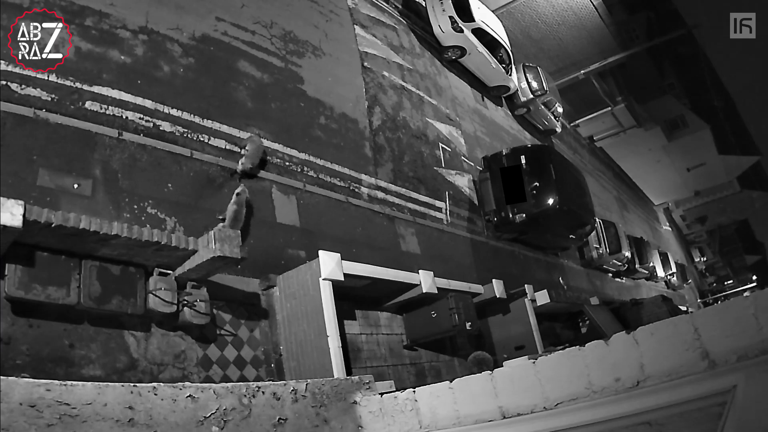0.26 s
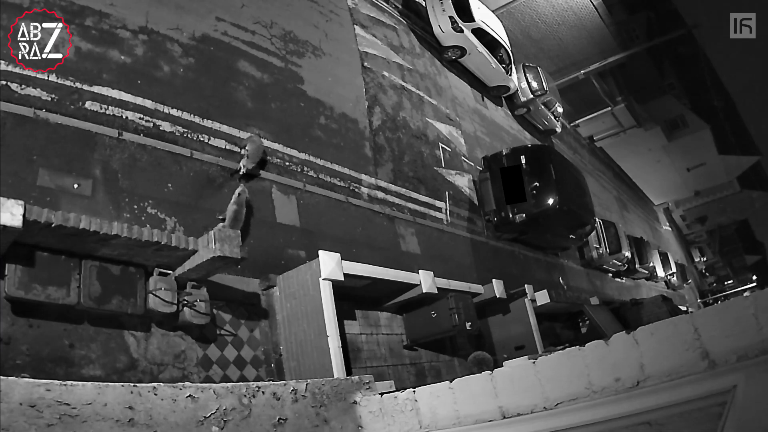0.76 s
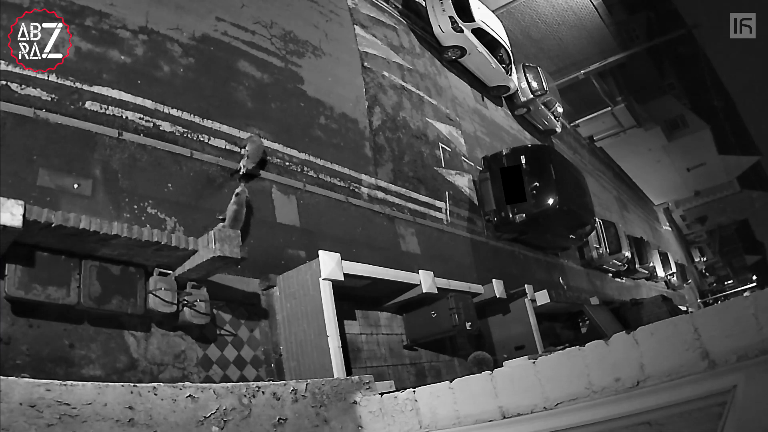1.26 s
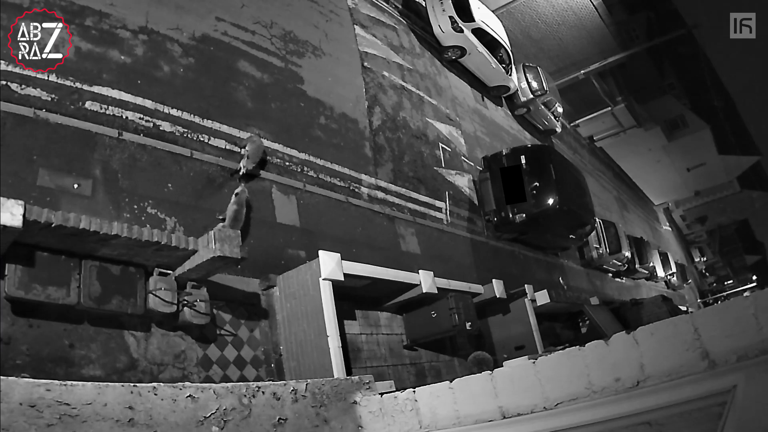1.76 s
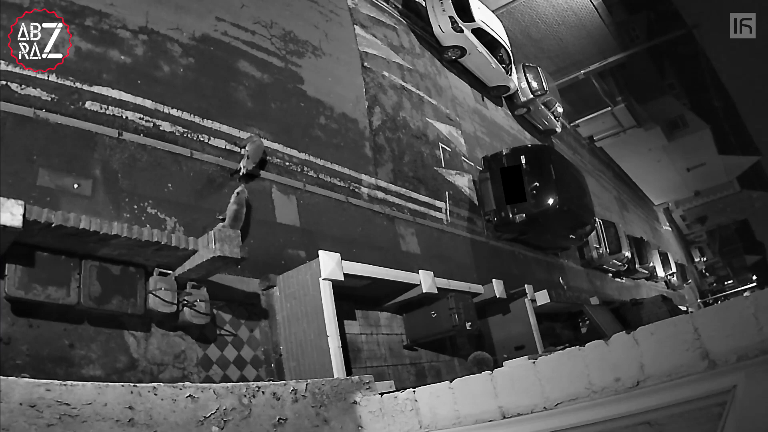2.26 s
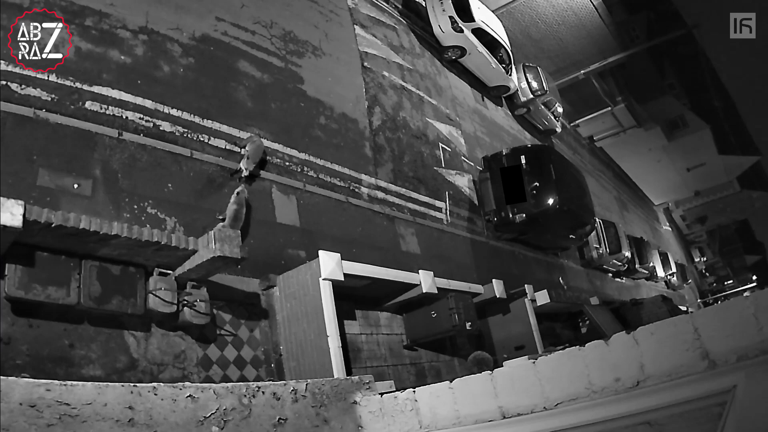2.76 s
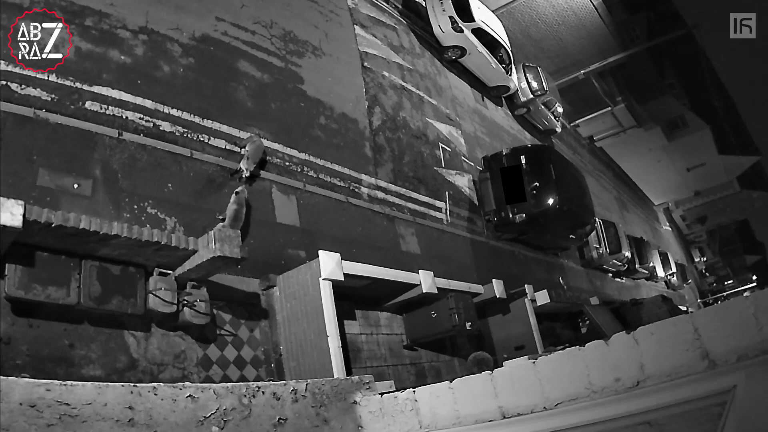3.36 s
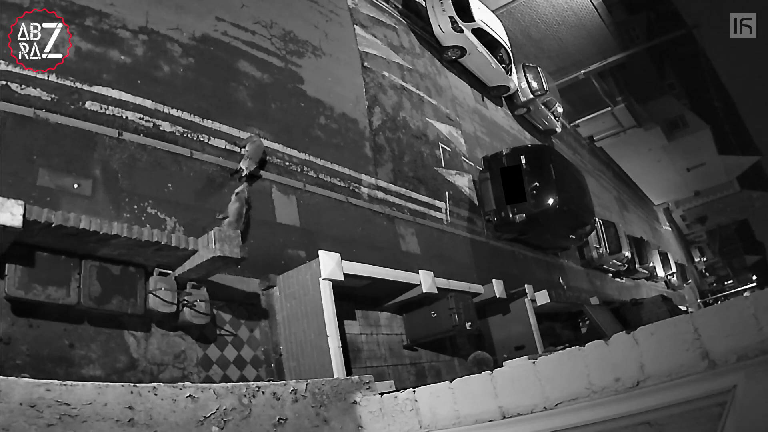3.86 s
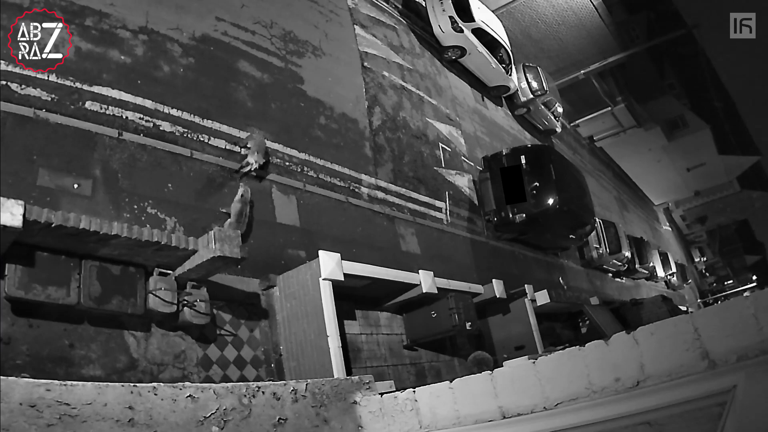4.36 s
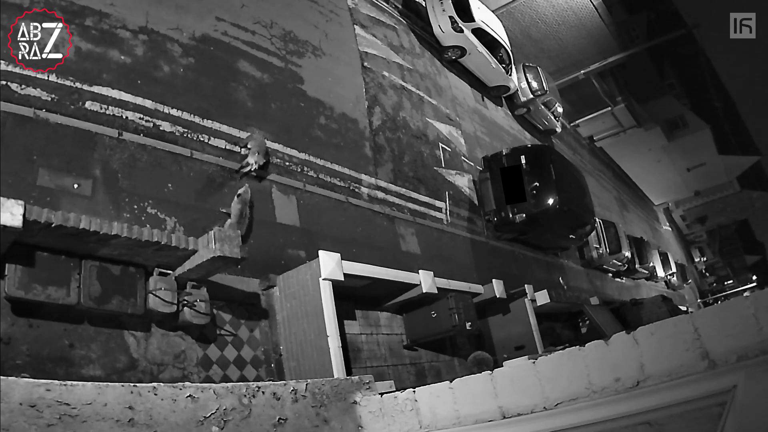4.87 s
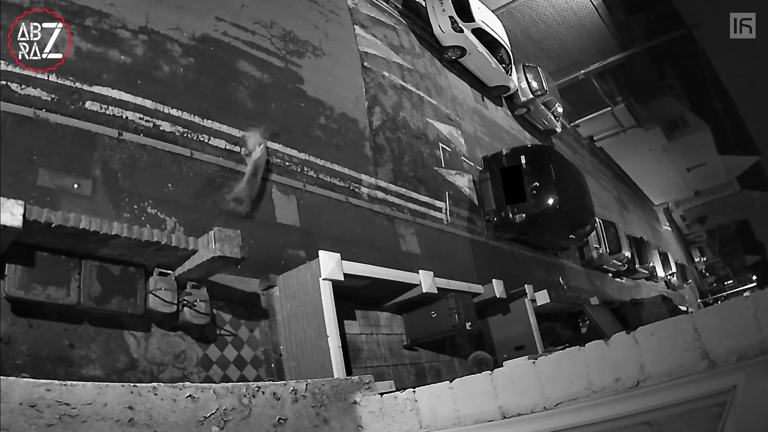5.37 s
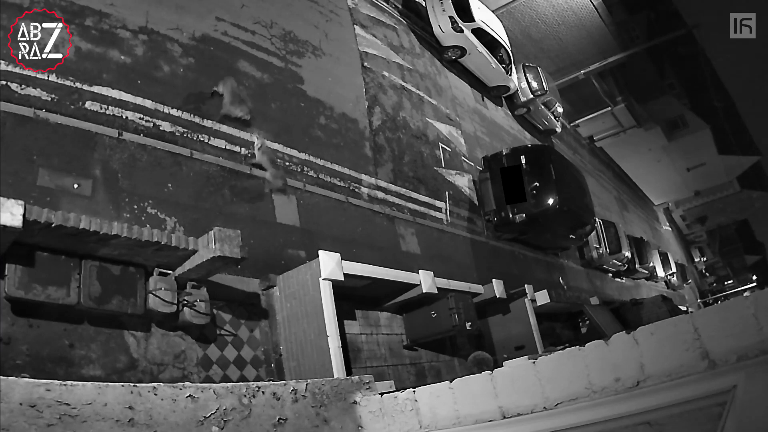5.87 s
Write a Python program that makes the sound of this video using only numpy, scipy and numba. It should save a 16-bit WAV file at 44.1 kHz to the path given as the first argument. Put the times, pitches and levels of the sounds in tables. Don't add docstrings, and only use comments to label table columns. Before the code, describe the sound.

Two foxes quarrel in a quiet street at night, picked up by a wall camera with faint air noise and low mains hum. A fluttering high yelp comes at 0.1 s, then a short hoarse screech at 0.3 and a rough yelp at 0.5, another screech at 0.8. From 1.1 to 1.7 s a quick run of chattering yelps leads into a longer raspy screech lasting until about 2.0. Paired yelp and screeches follow at 2.1-2.6, another exchange at 2.9-3.7 with a drawn-out falling yelp, and a strong screech at 3.9. Both voices burst together at 4.3 and 4.7-5.2. After 5.3 the chatter becomes dense and barking, with whistling, hissing screeches at 5.6, 5.8 and 6.1 to the end. Short house-front echoes trail each call; the treble is gritty and metallic.

```python
import sys
import numpy as np
from scipy import signal
from scipy.fft import rfft, irfft
from scipy.io import wavfile
from scipy.ndimage import uniform_filter1d
from numba import njit

SR = 44100
rng = np.random.default_rng(int(sys.argv[2]) if len(sys.argv) > 2 else 0)


def level_to_linear(level):
    exponent = np.asarray(level, float) / 20
    return 10 ** exponent


def put_to_file(sound):
    columns = np.atleast_2d(sound).T
    safe = np.clip(columns, -1, 1)
    whole_steps = np.round(safe * 32767)
    wavfile.write(sys.argv[1], SR, whole_steps.astype(np.int16))


N = 269892
T = np.arange(N) / SR

# centre_hz, width_hz, level_db
MOUTH_MODES = [(2704, 101, -7), (3595, 630, 4), (4278, 307, 10), (4917, 176, 8.5), (5453, 447, 0.5),
               (6615, 350, -10.5)]


def unit(x):
    return x / np.sqrt(np.mean(x ** 2))


def ramp(x):
    return np.clip(x, 0, 1)


def coloured(x, gain):
    return irfft(rfft(x) * gain(np.fft.rfftfreq(N, 1 / SR) + 1), N)


def shaped(x, points):
    hz, db = np.transpose(points)
    return coloured(x, lambda f: level_to_linear(np.interp(np.log(f), np.log(hz), db)))


def noise(points):
    return unit(shaped(rng.standard_normal(N), points))


def walk(rate_hz):
    k = max(int(SR / 16 / rate_hz), 2)
    coarse = rng.standard_normal(N // 16 + 2)
    coarse = unit(uniform_filter1d(uniform_filter1d(coarse, k), k))
    return np.interp(np.arange(N) / 16, np.arange(len(coarse)), coarse)


@njit
def band(x, hz, width_hz):
    y, b, l = np.empty(len(x)), np.zeros(2), np.zeros(2)
    for i in range(len(x)):
        g, k, u = np.tan(np.pi * hz[i] / SR), width_hz / hz[i], x[i]
        for s in range(2):
            v = (b[s] + g * (u - l[s])) / (1 + g * (g + k))
            b[s], l[s], u = 2 * v - b[s], l[s] + 2 * g * v, k * v
        y[i] = u
    return y


def resonate(x, modes, stretch, patchy_db):
    out = 0
    stretch = stretch * (1 + 0.012 * walk(18))
    for hz, width_hz, db in modes:
        gain = level_to_linear(db + patchy_db * walk(38)) / np.sqrt(width_hz)
        out = out + gain * band(x, hz * stretch, 3.11 * width_hz)
    return unit(out)


def calls(rows, length_column, fade_s):
    which = np.maximum(np.searchsorted(rows[:, 0], T) - 1, 0)
    since_s, length_s = T - rows[which, 0], rows[which, length_column]
    gate = ramp(np.minimum(since_s, length_s - since_s) / fade_s)
    return which, since_s, gate, rows[which, 1:].T


def flap_count(which, since_s, flap_hz):
    count = np.cumsum(flap_hz) / SR
    opens_s = np.clip(T - since_s + .009, 0, T[-1])
    return count - np.interp(opens_s, T, count) + 1000 * which


def flutter(flaps, depth, sharp):
    puff = (.5 + .5 * np.cos(2 * np.pi * flaps)) ** sharp
    depth = ramp(depth)
    shape = 1 - depth + depth * puff
    return shape / np.sqrt(uniform_filter1d(shape ** 2, size=1500))


def night():
    # hz, level_db_per_hz
    air = [(24, -78.5), (40, -49.5), (269, -19.5), (321, -11.5), (438, -13.5), (653, -20), (1420, -11),
           (1980, -23), (4300, -16), (8000, -43), (10400, -67.5), (17600, -120)]
    # hz, level_db
    hum = [(152, -83), (253.2, -76), (456, -84), (558, -86.5)]
    tones = sum(level_to_linear(db) * np.sqrt(2) * np.sin(2 * np.pi * hz * T) for hz, db in hum)
    return level_to_linear(-71) * noise(air) + tones


def screecher():
    # start_s, length_s, hiss_and_whistle_db, reed_db, rasp_db
    screeches = [(-.12, 0.17, -46, -66, -49), (.295, 0.17, -27, -50, -37.5), (.77, .16, -30.5, -51, -39.5),
                 (1.455, 0.58, -28.5, -52, -36.5), (2.305, .19, -26, -42.5, -34.5),
                 (2.497, .085, -31.5, -49.5, -53), (2.865, 0.16, -28.5, -41.5, -33.5),
                 (3.31, .375, -30.5, -49.5, -38.5), (3.935, 0.16, -21.5, -43.5, -33.5),
                 (4.28, 0.17, -33, -51, -38.5), (4.74, .15, -32.5, -39, -41.5),
                 (4.915, 0.16, -36.5, -56, -58), (5.06, 0.16, -24, -40.5, -33.5),
                 (5.575, 0.12, -30.5, -56.5, -32), (5.8, 0.12, -20.5, -44.5, -31),
                 (6.065, 0.24, -23, -50, -31.5)]
    # flutter_depth_0_1, whistle_hz, whistle_db, reed_sag_hz, reed_third_multiple_db
    manner = [(0.51, 3800, -15, 200, -14), (0.5, 4080, -7, 230, -7), (0.5, 4000, -4, 220, -1.5),
              (0, 4100, 0, 220, -2.5), (.4, 4130, -2.5, 170, 0.5), (0.4, 4500, -18, 230, -18),
              (0.06, 4250, 1, 220, -2.5), (0, 4100, -2.5, 200, -8), (0.54, 4200, -5.5, 190, -2),
              (0.06, 4620, -1, 15, 8), (0.2, 4300, -10, 220, -8), (0, 4300, -29, 200, -12),
              (0.5, 4600, -6.5, 10, 1), (0, 4020, 9, 8.9, -12), (0.5, 4400, -2.5, 60, 13),
              (0.1, 4000, 3, 15, -16)]
    # centre_hz, width_hz, level_db
    throat_modes = [(1397, 31, -10), (1658, 133, 7.5), (2363, 340, 6)]
    which, since_s, gate, columns = calls(np.c_[screeches, manner], length_column=1, fade_s=0.013)
    length_s, hiss_db, reed_db, rasp_db, depth, whistle_hz, whistle_db, sag_hz, third_db = columns
    left_s = length_s - since_s
    rising, ending = ramp(1 - since_s / 0.044), ramp(1 - left_s / 0.079)

    def breathed(db, swell_db, fade_db, tire_db_per_s):
        return db - swell_db * rising - fade_db * ending - tire_db_per_s * ramp(since_s)

    reed_db = breathed(reed_db, 27, 5, -17.5)
    rasp_db = breathed(rasp_db, 11, 12.5, -6)
    hiss_db = breathed(hiss_db, 14, 18, 8)

    sag = ramp(3.2 * (1 - left_s / .06))
    reed_hz = 950 + 70.26 * np.exp(-ramp(since_s) / .05) - sag_hz * sag
    reed_hz = reed_hz * (1 + 0.017 * walk(12))
    flaps = flap_count(which, since_s, 97.8 * (1 + 0.14 * walk(15)))
    phase = 2 * np.pi * np.cumsum(reed_hz * (1 + .015 * walk(86.2))) / SR
    first = level_to_linear(5.1 * walk(43)) * np.sin(phase)
    third = level_to_linear(third_db + 1.5 + 3.8 * walk(90)) * np.sin(3 * phase + 1.6 * walk(300))
    sag_gain = (reed_hz / 960) ** 3.5
    reed = np.sqrt(2) * sag_gain * (first + third)

    chaos = rng.standard_normal(N) * (.5 + .5 * np.cos(phase)) ** 2.4 * level_to_linear(1.4 * walk(160))
    whistle_hz = whistle_hz * (1 - .08 * rising ** 2)
    waver = 1 + 0.016 * (walk(17) + 2.3 * walk(500))
    whistle = np.sin(2 * np.pi * np.cumsum(whistle_hz * waver) / SR) * level_to_linear(1.63 * walk(55))
    whistle = whistle * (1 + 0.96 * np.cos(phase))
    jaw = whistle_hz / 4177
    hiss = resonate(chaos, MOUTH_MODES, jaw, patchy_db=5.5) + level_to_linear(whistle_db) * whistle
    rasp = resonate(chaos, throat_modes, 0.97, patchy_db=2.5)
    airy = level_to_linear(rasp_db) * rasp + level_to_linear(hiss_db - 1.5) * hiss
    return gate * (level_to_linear(reed_db) * reed + flutter(flaps, depth, 3.) * airy)


def chatterer():
    # start_s, turn_after_s, length_s, turn_hz, far_end_hz
    yelps = [(.124, .031, .13, 1776, 950), (.295, .03, .047, 1800, 1497), (.501, .012, .125, 2074, 916.5),
             (1.077, 0.047, .11, 1379, 1232), (1.188, .047, .113, 880, 1330),
             (1.302, .045, .105, 1395, 1130), (1.435, .055, .065, 1690, 1300),
             (1.622, .05, .088, 1750, 1600), (2.121, .036, .108, 1715, 1330), (2.29, .04, .045, 1680, 1350),
             (2.992, .038, .13, 1900, 1000), (3.152, .16, .2, 1620, 780), (3.685, .045, .145, 1900, 900),
             (4.285, .015, .115, 2254, 1502), (4.715, 0.0122, .105, 1654, 1402),
             (4.935, .05, 0.075, 1172, 950), (5.288, .015, .108, 1870, 1336),
             (5.396, .045, .113, 1215, 1700), (5.51, .035, .11, 2162, 1650),
             (5.737, 0.034, .083, 2052, 1939), (5.983, 0.023, .14, 2234, 1548)]
    # fundamental_db, overtones_db, roughness_0_1, flutter_depth_0_1
    manner = [(-36.5, -30, .25, .89), (-39, -48, .46, 0.54), (-30.5, -20.5, 0.76, 0.94),
              (-43.5, -34.5, .3, .93), (-47, -72, .15, 0.2), (-42, -30, 0.43, 0.93), (-35, -29.5, .15, 0),
              (-33, -20.5, .45, 0.84), (-36, -29, 0.3, 0.72), (-40.5, -54.5, 0.7, 0.8),
              (-34.5, -22.5, 0.61, .79), (-36.5, -28.5, 0.29, 0.87), (-34, -25.5, .5, 0.79),
              (-33, -23, .85, 0.74), (-33, -26.5, 0.6, 0.76), (-47.5, -41, .15, 0.4),
              (-34, -23.5, 0.6, .84), (-46, -47, .2, 0.9), (-29, -16.5, .82, 0.99), (-29, -22, 0.8, 0.6),
              (-36.5, -27, .7, 0.81)]
    turn_flap_hz = [76, 75, 75, 71, 50, 76, 75, 84, 98, 75, 90, 80, 88, 78, 70, 70, 88, 55, 72, 92, 70]
    # hz, level_db
    overtone_colour = [(2000, 12), (2750, -7.5), (3400, -2.5), (4200, 2.5), (5050, -7), (5600, 5.5),
                       (6500, -15.5), (7600, -4)]
    which, since_s, gate, columns = calls(np.c_[yelps, manner, turn_flap_hz], length_column=2, fade_s=0.0016)
    turn_s, length_s, turn_hz, far_hz, low_db, high_db, rough, depth, flap_hz = columns
    rough = ramp(rough)
    bend = ramp(np.abs(since_s - turn_s) / np.maximum(turn_s, length_s - turn_s)) ** 2.0
    glide_hz = turn_hz + (far_hz - turn_hz) * bend

    octaves = np.log2(glide_hz / turn_hz)
    attack_db = 15 * ramp(1 - since_s / (.022 + .7 * turn_s)) ** 2
    attack_db = attack_db * (far_hz < turn_hz)
    low_db = low_db + 7.5 * octaves - attack_db
    high_db = high_db + 29 * octaves - attack_db

    flaps = flap_count(which, since_s, flap_hz * (glide_hz / turn_hz) ** 1.05)
    puff_s = np.interp(np.round(flaps), flaps, T)
    hz = np.interp(T + 1.03 * ramp(depth) * (puff_s - T), T, glide_hz)
    phase = 2 * np.pi * np.cumsum(hz * (1 + 0.0514 * rough * walk(400))) / SR

    at_hz, colour_db = np.transpose(overtone_colour)
    gains_db = np.interp(np.outer((2, 3, 4), hz), at_hz, colour_db).reshape(3, N)
    gains = level_to_linear(gains_db + np.outer((0, 1, 1), -32 * np.log2(turn_hz / 1450)))
    overtones = 0
    for k, gain in enumerate(gains, 2):
        overtones = overtones + gain * (k * hz < 7600) * level_to_linear(1.7 * walk(46)) * np.sin(k * phase)
    overtones = overtones * np.sqrt(2 / np.sum(gains ** 2, axis=0))

    breath = rng.standard_normal(N) * (1 + 0.3 * np.cos(phase))
    throat = 1 / np.sqrt(1 + ((hz - 1620) / 800) ** 2)
    tone = level_to_linear(2.9 * walk(53)) * throat * np.sin(phase + 0.69 * walk(300))
    growl = noise([(300, -40.0), (600, -30.0), (1000, -10.0), (1600, 1.5), (2300, -16.5), (4000, -13.5)])
    low = np.sqrt(2 - 2 * rough ** 2) * tone + rough * growl
    mouth_breath = resonate(breath, MOUTH_MODES, 0.95, patchy_db=3.5)
    high = np.sqrt(1 - rough) * overtones + np.sqrt(rough) * mouth_breath
    thump = noise([(50, -22), (120, -39.5), (300, 0.5), (700, -1.5), (1000, 1.5), (2000, -27.0)])
    high = high + level_to_linear(-46 + 31.5 * rough) * thump
    low = level_to_linear(low_db) * flutter(flaps, 0.7 * depth, 0.59) * low
    return gate * (low + flutter(flaps, depth, 3.2) * level_to_linear(high_db) * high)


def street(x):
    # t60_s, level_db
    fronts = [(0.298, -10.5), (0.901, -29.5)]
    # hz, level_db
    echo_colour = [(300, -10), (950, -2), (1500, 7), (3000, -2.5), (5000, 1), (8000, 8)]
    s = T[:SR]
    tail = sum(level_to_linear(db) * unit(np.exp(-np.log(1000) * s / t60_s)) for t60_s, db in fronts)
    tail = tail * (s > .008)
    echoes = signal.fftconvolve(x, rng.standard_normal(SR) * tail / np.sqrt(SR))[:N]
    return x + shaped(echoes, echo_colour)


def spill(foxes):
    # hz, level_db_per_hz
    spill_colour = [(18, -53), (30, -14.5), (226, -15), (367, -14.5), (547, -14), (838, -11), (900, -19.5),
                    (1170, -35), (1980, -120)]
    loudness = np.sqrt(np.abs(uniform_filter1d(foxes ** 2, size=300)))
    return level_to_linear(-31.5) * loudness * noise(spill_colour)


def scene():
    foxes = street(chatterer() + screecher()) * level_to_linear(0.5)
    return (foxes + spill(foxes) + night())[None]


def low_pass(x):
    return signal.sosfilt(signal.butter(12, 16150, fs=SR, output="sos"), x)


def record(dry):
    camera_hz = 16195
    base = coloured(dry[0], lambda f: ramp((camera_hz / 2 - f) / 500))
    held = coloured(base, lambda f: level_to_linear(0.85) * np.clip(f / np.abs(camera_hz - f), .12, 1))
    mirrored = 2 * held * np.cos(2 * np.pi * camera_hz * T)
    image = coloured(mirrored, lambda f: (f > camera_hz / 2) & (f < camera_hz))
    mix = 0.86 * np.tanh((base + image) / 0.96)
    return low_pass(mix[None])


dry = scene()
out = record(dry)
put_to_file(out)
```